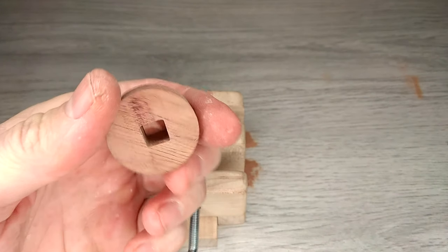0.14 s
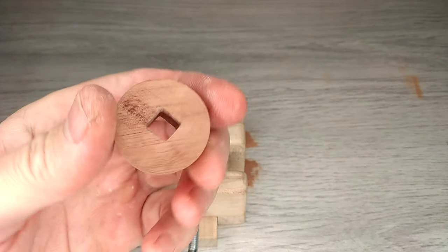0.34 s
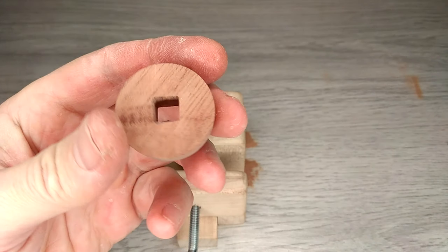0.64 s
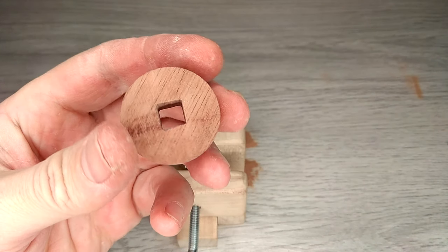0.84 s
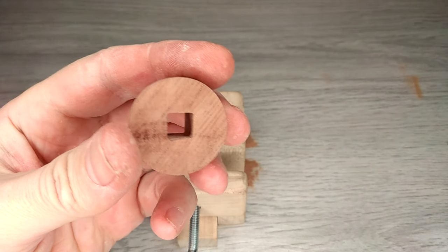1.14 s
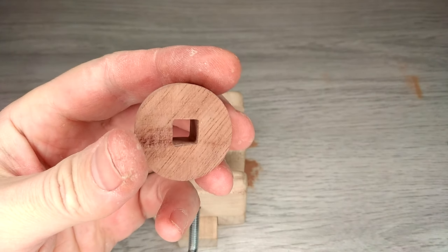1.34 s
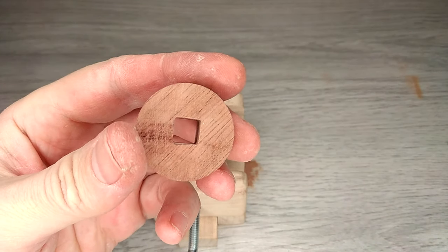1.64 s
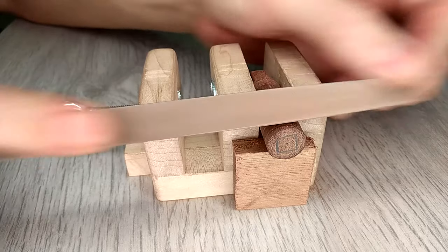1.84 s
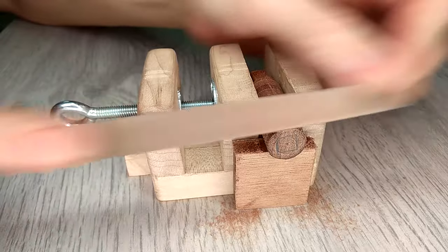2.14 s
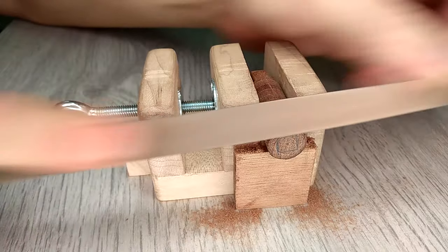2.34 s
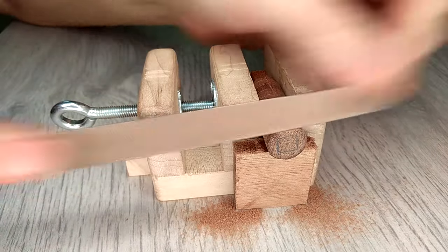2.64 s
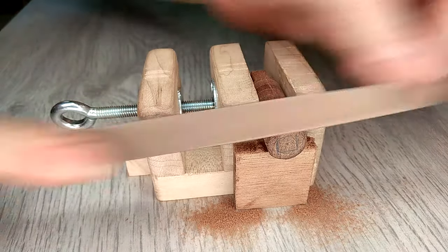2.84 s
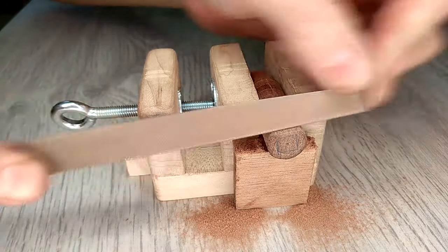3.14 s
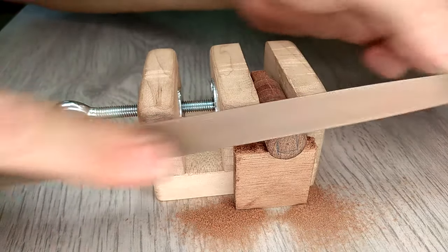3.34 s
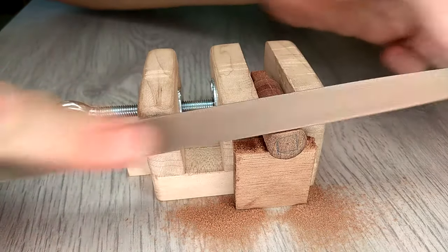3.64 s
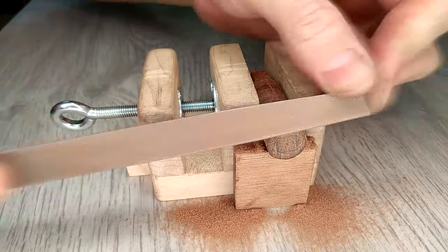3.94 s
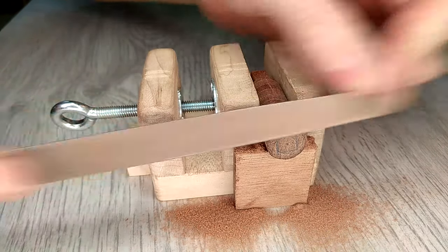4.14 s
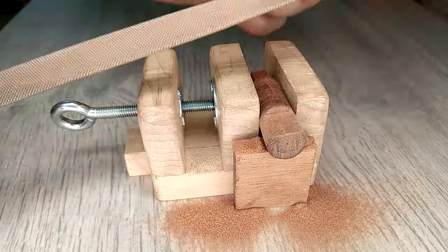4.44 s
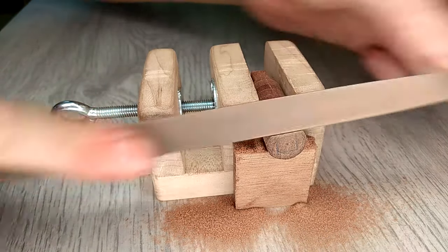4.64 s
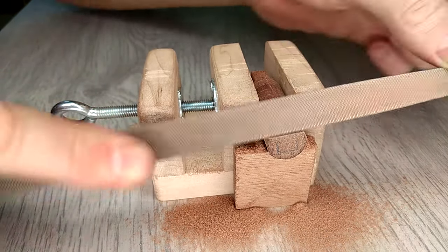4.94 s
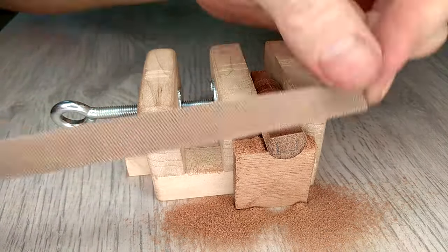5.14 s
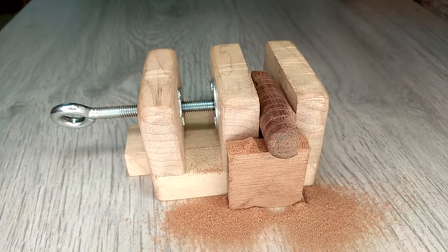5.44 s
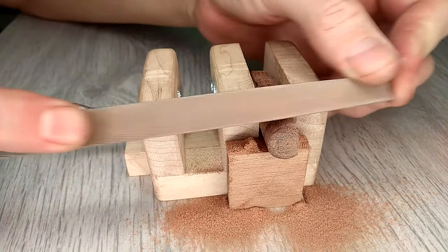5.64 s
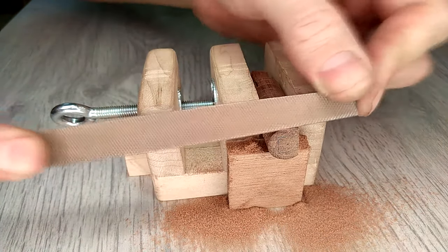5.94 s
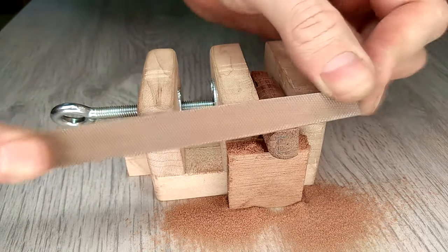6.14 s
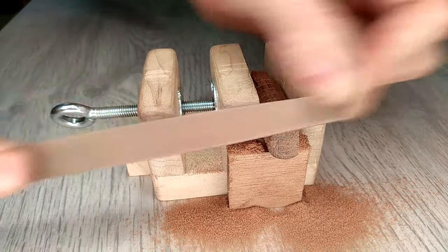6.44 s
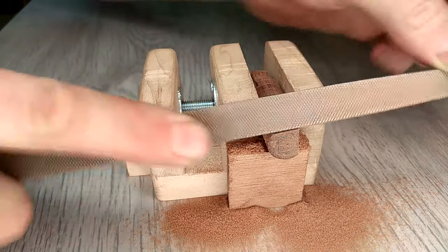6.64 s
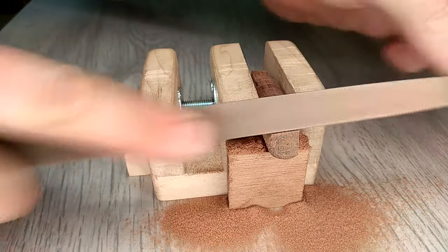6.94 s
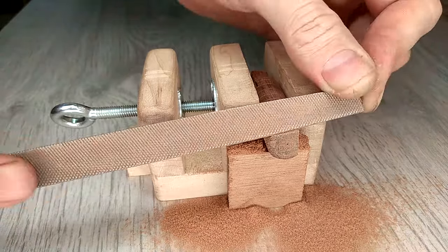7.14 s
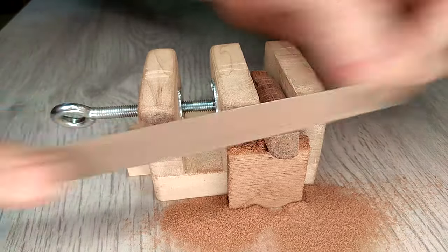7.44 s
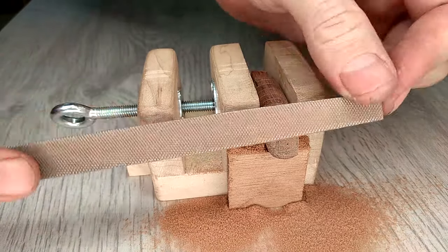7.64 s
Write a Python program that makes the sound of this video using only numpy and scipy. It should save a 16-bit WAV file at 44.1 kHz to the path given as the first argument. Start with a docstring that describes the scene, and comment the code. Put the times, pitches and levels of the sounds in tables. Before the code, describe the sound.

Soft thuds of hands on a table, then close filing of wood, with high metallic squeals and one brief pause.

```python
"""A bright hiss dies away; hands shift on a table top, which thuds softly over a faint room hiss.
From 1.8 s a steel file rasps to and fro over a dowel in a small wooden vise, close to a stereo microphone.
Its teeth tear fibres and shake vise, table and blade; the blade squeals in bursts. Pauses fade to silence.
Near 5.5 s the file lifts and the dowel is changed, with faint scratches and a thud.
Filing goes on to the end, with one low groan at 6.3 s."""
import sys
import numpy as np
from scipy import signal
from scipy.fft import rfft, irfft, next_fast_len
from scipy.io import wavfile
from scipy.ndimage import uniform_filter1d, map_coordinates

SR = 44100
rng = np.random.default_rng(int(sys.argv[2]) if len(sys.argv) > 2 else 0)


def digitize_waveform(pressure):
    """Quantize a signal to 16-bit integers and store it at the path in sys.argv[1].

    Rows of a 2-D input are taken as channels; values are limited to [-1, 1].
    """
    field = np.atleast_2d(pressure).T
    bounded = np.clip(field, -1, 1)
    quanta = np.round(bounded * 32767).astype(np.int16)
    wavfile.write(sys.argv[1], SR, quanta)


N = 343980
TIME_S = np.arange(N) / SR


def amp(db):
    return 10 ** (np.asarray(db) / 20)


def unit(x):
    return x / np.sqrt(np.mean(np.abs(x) ** 2) + 1e-20)


def along(points, hz):
    """Interpolate (frequency [Hz], value) points on a log axis."""
    knots_hz, values = np.transpose(points)
    return np.interp(np.log(hz + 1), np.log(knots_hz + 1), values)


def rounded(x, size):
    return uniform_filter1d(uniform_filter1d(x, size), size)


def curves(tables):
    """Each column per sample, then a gate open inside the tables' time spans."""
    times_s, *columns = np.concatenate(tables).T
    inside = sum((TIME_S >= rows[0][0]) & (TIME_S <= rows[-1][0]) for rows in tables) > 0
    tracks = [np.interp(TIME_S, times_s, column) for column in columns]
    return [rounded(track, 130) for track in tracks + [inside * 1.0]]


def wobble(rate_hz):
    """Smooth random curve, rate_hz knots a second."""
    knots = rng.standard_normal(int(N * rate_hz / SR) + 4)
    return map_coordinates(knots, [TIME_S * rate_hz])


def filtered(x, response):
    """Apply a complex frequency response."""
    size = next_fast_len(N + 2 ** 14)
    return irfft(rfft(x, size) * response(np.fft.rfftfreq(size, 1 / SR)), size)[..., :N]


def noise_pair():
    return rng.standard_normal((2, N))


def coloured(x, colour):
    """Shape x by (frequency [Hz], gain [dB]) points; unit rms."""
    return unit(filtered(x, lambda f: amp(along(colour, f))))


def body(modes, bed=((20, -60), (20000, -60))):
    """Gain of frequency: resonances summed in power over a smooth bed."""
    def gain(f):
        peaks = sum(amp(2 * db) * (f * width) ** 2 / ((hz * hz - f * f) ** 2 + (f * width) ** 2)
                    for hz, width, db in modes)
        return np.sqrt(peaks + amp(2 * along(bed, f)))
    return gain


# Hiss decay: (time [s], level [dB])
HISS_DECAY = [(0, -58), (.05, -64), (.1, -75), (.16, -100)]
# Hiss spectrum: (frequency [Hz], gain [dB])
HISS_COLOUR = [(2350, -66), (4000, -36), (4210, -15), (4780, -24), (6090, -1), (14300, -6), (15800, -6)]


def opening_hiss():
    """A bright hiss dies away."""
    level_db, gate = curves([HISS_DECAY])
    return amp(level_db) * gate * coloured(noise_pair(), HISS_COLOUR)


# Audible room, one list per span: (time [s], relative buzz level [dB])
ROOM_SPANS = [
    [(0.0, -88), (1.1, -85.5), (1.754, -86), (1.76, -99)],
    [(5.41, -100), (5.534, -88), (5.626, -92), (5.65, -83)],
]
# Room hiss spectrum: (frequency [Hz], gain [dB])
ROOM_COLOUR = [(180, -27), (300, -5.5), (410, -11), (740, -10), (930, -12.5), (1020, -19), (1230, -21.5),
               (2320, -22.5), (5900, -28.5), (9000, -25.5), (12400, -28), (12900, -50), (15000, -70)]
# Electrical buzz band: (frequency [Hz], width [Hz], gain [dB])
BUZZ_BAND = [(10800, 1500, 0)]
# Room tones: (frequency [Hz], relative level [dB])
ROOM_TONES = [(371.4, -88), (495.3, -92), (716.0, -96.5), (920.5, -99), (2055, -102)]


def room(mains_hz=60):
    """Hiss, faint tones and a thin high buzz that pulses with the mains."""
    buzz_db, gate = curves(ROOM_SPANS)
    hiss = coloured(noise_pair(), ROOM_COLOUR)
    mains_rad = 2 * np.pi * mains_hz * TIME_S
    pulses = amp(3.1 * np.cos(mains_rad) + 2.2 * np.cos(2 * mains_rad) + 1.5 * wobble(25))
    buzz = unit(filtered(noise_pair() * pulses, lambda f: body(BUZZ_BAND)(f) ** 1.4 * (f < 12700)))
    hum = sum(amp(db + 2 + 1.8 * wobble(8)) * np.sin(2 * np.pi * hz * TIME_S + 0.6 * wobble(6))
              for hz, db in ROOM_TONES)
    return gate * (amp(-78.5) * hiss + amp(buzz_db + 2.5) * buzz + hum)


# Drag before filing: (time [s], relative level [dB])
OPENING_DRAG = [(0.0, -79), (0.084, -54), (0.356, -77), (0.416, -63), (0.484, -62), (0.514, -86),
                (0.54, -67), (0.58, -50), (0.762, -63), (0.798, -79), (0.836, -58.5), (0.986, -63),
                (1.026, -65), (1.06, -61), (1.154, -61), (1.194, -65), (1.264, -57.5), (1.67, -61),
                (1.69, -59.5), (1.78, -57)]
# Drag at the dowel change: (time [s], relative level [dB])
REGRIP_DRAG = [(5.44, -69), (5.474, -58), (5.572, -59), (5.63, -62), (5.66, -55)]
# Table top under a hand: (frequency [Hz], width [Hz], gain [dB])
PALM_MODES = [(60, 40, -23), (106, 69, 0.5), (171, 39, 2.5), (240.5, 42, 1.5), (367, 30, -25)]


def skin_drag():
    """Skin drags over the table top and stirs its low modes."""
    level_db, gate = curves([OPENING_DRAG, REGRIP_DRAG])
    friction = noise_pair() * amp(3.4 * wobble(22.03))
    mid, side = unit(filtered(friction, lambda f: body(PALM_MODES)(f) ** 2.34 / (1 + (f / 420) ** 6)))
    return amp(level_db - 0.5) * gate * (0.95 * mid + 0.26 * side * [[1], [-1]])


# Hand pushes: (time [s], relative level [dB], pitch [Hz], swell time [s])
THUDS = [(0.08, -36, 169, 0.012), (0.411, -47, 170, 0.014), (0.546, -38.5, 187, 0.0038),
         (0.568, -36, 179, 0.003), (0.589, -35, 179, 0.0023), (0.71, -48, 254, 0.0079),
         (0.837, -43, 170.3, 0.017), (0.869, -47, 168, 0.012), (0.959, -43, 182, 0.0061),
         (1.056, -39.5, 166, 0.006), (1.075, -40.5, 176, 0.0053), (1.1, -52, 176, 0.004),
         (1.132, -37.5, 182, 0.0031), (1.155, -47, 175, 0.0054), (1.286, -49, 206, 0.012),
         (1.448, -57, 177, 0.013), (1.533, -40, 169, 0.004), (1.685, -41, 195, 0.0056),
         (1.738, -47, 192, 0.0084), (5.596, -35, 169, 0.0093), (7.636, -51, 189, .007)]


def thuds(knock_ratio=1.6, knock_db=-11.5, knock_decay_s=0.016):
    """Soft pushes swell in a low table mode and a higher, shorter one."""
    out, t = np.zeros(N + SR), np.arange(SR // 4) / SR
    for time_s, db, hz, swell_s in THUDS:
        age = t / (2 * max(swell_s, 0.002))
        envelope = amp(db - 9) * (age * np.exp(1 - age)) ** 2
        knock = amp(knock_db) * np.exp(-t / knock_decay_s) * np.sin(2 * np.pi * knock_ratio * hz * t)
        low_mode = np.sin(2 * np.pi * hz * t + rng.uniform(0, 2 * np.pi))
        out[round((time_s - swell_s) * SR):][:len(t)] += envelope * (knock + low_mode)
    return out[:N]


# Wooden blips, one low groan: (time [s], relative level [dB], pitch [Hz], half length [s])
BLIPS = [(.27, -88, 3980, .03), (.54, -80, 750, .02), (.61, -84, 2050, .09), (0.762, -79, 735, .03),
         (.81, -70, 507, 0.015), (.97, -69.5, 365, 0.027), (1.13, -67, 528, .02),
         (1.249, -79.5, 750, 0.033), (1.06, -80, 740, .04), (1.39, -85, 1420, .03), (1.4, -66, 511, 0.045),
         (1.53, -67, 371, 0.036), (1.6, -69, 722, 0.03), (1.7, -77, 810, .03), (5.494, -66, 500, .04),
         (5.49, -80, 930, .03), (5.58, -79, 880, 0.038), (5.614, -62.5, 623, .015),
         (6.329, -36, 289, 0.043), (7.664, -60, 400, 0.008)]


def blips():
    """Small wooden parts ring briefly at an unsteady pitch."""
    out = np.zeros(N + SR)
    for time_s, db, hz, half_s in BLIPS:
        t = TIME_S[:int(half_s * 2 * SR)]
        drift_rad = 0.045 * uniform_filter1d(np.cumsum(rng.standard_normal(SR // 4)), size=300)
        ring = np.sin(2 * np.pi * hz * t + drift_rad[:len(t)])
        out[round((time_s - half_s) * SR):][:len(t)] += amp(db) * np.hanning(len(t)) * ring
    return out[:N]


# File strokes, one list each, first to last contact: (time [s], relative cutting level [dB],
# blade hiss offset [dB], vise growl offset [dB], table shake offset [dB], blade ring offset [dB])
STROKES = [
    [(1.965, -39, -2, 5, 1.5, 0), (2.017, -36, -5.5, 1.5, -10, 1), (2.11, -35, -4, 1, -9, 0.5),
     (2.18, -35, -4, -4, -10.5, 0), (2.33, -36, -4, 4, -10.5, -2), (2.399, -34.5, -4, 1, -11.5, -1.5),
     (2.467, -36, -2.5, 2.5, -8.5, 0.5), (2.545, -36.5, -6, 5.5, -13, -4)],
    [(2.84, -36.5, -3, -1, -7, 5), (2.908, -37, -2, -5.5, -13.5, 6), (3.0, -37.5, -2, -0.5, -10.5, 5.5),
     (3.11, -40, -1.5, -2, -11.5, 1), (3.2, -39, -4.5, 4.5, -10.5, -2.5), (3.37, -39, -2.5, 0.5, -9.5, 4.5),
     (3.46, -36.5, -3.5, -2, -15, -2.5)],
    [(3.6, -39, -2, 7, -5.5, -4.5), (3.626, -36.5, -2.5, 3.5, -8.5, 1.5), (3.79, -38.5, -2, 2, -11.5, 0.5),
     (3.884, -38.5, -5, 7.5, -9, -6), (3.905, -40.5, -4.5, 5.5, -6.5, -9)],
    [(3.92, -39, -4, 6.5, -6.5, -0.5), (3.954, -37, -0.5, -1.5, -10.5, -4.5),
     (4.002, -35.5, -2, -5, -8.5, -3.5), (4.06, -40.5, 1, -1.5, -6, 6.5), (4.07, -38, -2, -10.5, -8, 4)],
    [(4.111, -38.5, 1, -2, -9, 10.5), (4.133, -37.5, -2.5, -3.5, -9, 1.5),
     (4.247, -40, -1, -0.5, -12.5, 6.5), (4.409, -40, -1.5, 1.5, -10, 1), (4.43, -45, 0, -5.5, -18, 4.5)],
    [(4.64, -41, -0.5, 3.5, -13.5, 10), (4.788, -39, -1.5, -1, -10, -1), (4.962, -40, 0, 1, -10.5, 1.5),
     (5.022, -38.5, -0.5, -0.5, -11, -5), (5.055, -39, -1.5, -0.5, -12.5, 7.5)],
    [(5.784, -40.5, -5, 3.5, -2, -19), (5.814, -38.5, -4.5, 6.5, -2.5, -11),
     (5.93, -35.5, -1.5, -0.5, -10, 3), (6.124, -36.5, 0, -1, -10.5, 4), (6.19, -38.5, -0.5, -1, -7, 6.5)],
    [(6.2, -40.5, 1, 2, -10.5, 1), (6.236, -43, -0.5, 3.5, -5.5, 3.5), (6.262, -43, -1, 0, -3, -2.5),
     (6.332, -42.5, -1, 4, -6, -11), (6.392, -45, 1.5, -4, 2.5, -7.5)],
    [(6.41, -41.5, 0.5, 8.5, -4, -18), (6.434, -36, -2, -2.5, -14, 1), (6.56, -36.5, -0.5, 2, -12, 3),
     (6.68, -38.5, 1, -2, -9.5, 5), (6.76, -39, 1.5, 5, -11, 6.5), (6.85, -36.5, 0.5, -3, -10, 2),
     (6.97, -37.5, 0, 1.5, -9.5, -1), (7.088, -37, 0, -6.5, -14.5, -4.5), (7.115, -40, -1, 2, -12.5, 8)],
    [(7.245, -37.5, 2.5, 2.5, -12.5, -7), (7.283, -37.5, -1, -8.5, -15.5, 5), (7.349, -39, 3, 1, -9.5, 2),
     (7.507, -38, 1, 0.5, -7.5, 0), (7.56, -37.5, 1, -1.5, -10.5, 5.5)],
    [(1.805, -52, 0.5, 5, 7, 3), (1.867, -41.5, -5, 6.5, 2, -3), (1.915, -36, -6, -1, -7.5, 0)],
    [(2.59, -35.5, -2.5, -1, -6, 5), (2.682, -38, 1, -3.5, -15, 6.5), (2.715, -37, -4, 3.5, -9, 0)],
    [(5.243, -40, -1, -2, -5.5, 2), (5.273, -38.5, -1.5, 6.5, -5.5, 4),
     (5.356, -37.5, -0.5, -4, -11.5, 3.5)],
    [(5.665, -52.5, -3.5, 5.5, 10.5, -10.5), (5.689, -56, -4.5, 5, 10.5, -4), (5.7, -46, -6.5, 7, 7, -5)],
    [(5.715, -42, -3.5, 10.5, -3, -12), (5.728, -39.5, -6, 5, -2, -15), (5.744, -42, -7, 4, -3, -21)],
    [(7.73, -37.5, 1.5, 2.5, -4, -10.5), (7.756, -38.5, -2, 4, -17.5, 5.5), (7.795, -37.5, 1.5, 1.5, -7, 5)],
    [(1.758, -73.5, -8, 6, 12, -4), (1.785, -75.5, -5, -8, 2, -5)],
    [(4.556, -59, -4.5, 3, -6.5, -5.5), (4.566, -54, -9.5, 10, -1, -7)],
    [(4.605, -61, -12, -19, 13.5, -8), (4.61, -52.5, -8, 9, 6, -8)],
    [(5.424, -71, -7, -14, -2, -7), (5.436, -67.5, -15, -5, 2, -8)],
    [(7.135, -62.5, -8, -7, -6.5, -2), (7.152, -74, -6, -11, 12.5, -7)],
    [(7.668, -90.5, -18, 20, 28, -8), (7.69, -76, 5, -6, 13.5, -7)],
]


def strokes(rise_db_per_s=1344.5, fall_db_per_s=1150, silence_db=-101):
    """Levels of the loudest stroke per sample; before and after each stroke the sound fades to silence."""
    growl_lingers, shake_lingers = 0.051, 0.36  # share of the fade these layers do not follow
    t = np.arange(0, N / SR, 1e-3)
    loudness, levels = [], []
    for rows in STROKES:
        times_s, *columns = np.transpose(rows)
        cut, hiss, growl, shake, ring = [np.interp(t, times_s, column) for column in columns]
        away_db = rise_db_per_s * np.maximum(times_s[0] - t, 0)
        away_db += fall_db_per_s * np.maximum(t - times_s[-1], 0)
        fade = np.minimum(away_db, cut - silence_db)
        loudness.append(cut - away_db)
        levels.append([cut - fade, hiss, growl + growl_lingers * fade, shake + shake_lingers * fade, ring])
    loudest = np.array(levels)[np.argmax(loudness, axis=0), :, np.arange(len(t))].T
    return [np.interp(TIME_S, t, uniform_filter1d(column, size=13)) for column in loudest]


def tearing(scatter_db, chatter_db, chatter_hz, patchy_db):
    """Dense, uneven fibre snaps; the grip chatters and the colour shifts in patches as the contact moves."""
    snaps = noise_pair() * amp(scatter_db * rng.standard_normal(N))
    hz, _, spectra = signal.stft(snaps, SR, nperseg=1024)
    patches = uniform_filter1d(rng.standard_normal(spectra.shape[1:]), size=3, axis=0)
    patches = unit(uniform_filter1d(patches, size=6, axis=1))
    depth_db = patchy_db * np.clip(hz / 4000, 0, 1)[:, None]  # low modes hold steadier
    _, snaps = signal.istft(spectra * amp(depth_db * patches), nperseg=1024)
    return snaps[:, :N] * amp(chatter_db * wobble(chatter_hz))


def wandering(x, gain, shift, rate_hz):
    """Resonances drift up and down by the fraction shift as the contact travels."""
    low, high = filtered(x, lambda f: np.array([gain(f * (1 + shift)), gain(f * (1 - shift))])[:, None])
    mix = 0.5 + 0.5 * np.tanh(2.1 * wobble(rate_hz))
    return unit(mix * low + (1 - mix) * high)


# Vise and dowel: (frequency [Hz], width [Hz], gain [dB])
VISE_MODES = [(879, 27, -4.5), (1001, 185, -9.5), (1194, 47, -10.5), (1373, 33, -11.5), (1570, 50, -11),
              (1847, 34, -6), (1933, 56, -5), (2342, 38, -11), (2650, 410, -16.5), (3430, 110, -14.5),
              (4154, 60, -16.5), (4680, 92, -19.5), (5360, 220, -19)]
# Tearing between those modes: (frequency [Hz], gain [dB])
WOOD_BED = [(400, -56), (800, -28.5), (1200, -25), (2500, -16.5), (3150, -19), (3750, -22.5), (4300, -27.5),
            (5600, -19.5), (7500, -19.5), (9000, -53)]
# Vise rocking on the table: (frequency [Hz], width [Hz], gain [dB])
ROCKING_MODES = [(482, 45, -10.5), (580.4, 48, 0.5), (652, 39, -1), (683.5, 28, 1.5)]
# Blade on the first dowel: (frequency [Hz], width [Hz], gain [dB])
FIRST_BLADE_MODES = [(6060, 70, -6.5), (6300, 90, -9.5), (7180, 130, -1), (8060, 140, -9.5),
                     (8580, 190, -1), (9470, 480, -5), (9950, 140, -6.5), (10670, 280, -3.5),
                     (11450, 150, -5.5), (13300, 160, -12.5), (14200, 500, -18.5), (15600, 300, -20.5)]
# Blade held anew on the second dowel: (frequency [Hz], width [Hz], gain [dB])
SECOND_BLADE_MODES = [(4024, 130, -4.5), (4700, 150, -24), (5120, 170, -24), (5340, 139, -26),
                      (6160, 130, -29), (6885, 85, 7), (7420, 170, 0.5), (7410, 150, 4), (8110, 48, 5.5),
                      (8330, 47, 6), (8800, 80, -1), (9500, 480, -2), (10000, 390, -1), (10740, 340, -4),
                      (11430, 180, -1.5), (12020, 120, -4.5), (12760, 150, -10.5), (13400, 130, -6),
                      (14300, 500, -14), (15600, 300, -10)]
# Hiss between the blade modes: (frequency [Hz], gain [dB])
STEEL_BED = [(4500, -31), (6000, -15), (7800, -3.5), (9000, -12.5), (11500, -10), (12500, -14.5),
             (15500, -27.5)]
# Table top: (frequency [Hz], width [Hz], gain [dB])
TABLE_MODES = [(106, 22, -12), (171.6, 15.6, 0.5), (260, 53, -3.5), (300.6, 51, 2.5)]


def rasp(start_s=1.73, dowel_change_s=5.55):
    """Teeth tear fibres and shake the vise, the blade and the table under them."""
    cut_db, hiss_db, growl_db, shake_db, _ = strokes()
    grip = amp(cut_db + 0.15 * wobble(30)) * (TIME_S > start_s)
    fibres = tearing(scatter_db=2.5, chatter_db=0.25, chatter_hz=360, patchy_db=3)
    wood = wandering(fibres, body(VISE_MODES, WOOD_BED), shift=0.0062, rate_hz=9)
    rocking = tearing(scatter_db=2.5, chatter_db=1.2, chatter_hz=210, patchy_db=0.57)
    growl = wandering(rocking, lambda f: body(ROCKING_MODES)(f) ** 1.11, shift=0.013, rate_hz=7.9)
    scrape = tearing(scatter_db=1.5, chatter_db=0.6, chatter_hz=430, patchy_db=2.5)
    first_blade = unit(filtered(scrape, body(FIRST_BLADE_MODES, STEEL_BED)))
    second_blade = unit(filtered(scrape, body(SECOND_BLADE_MODES, STEEL_BED)))
    steel = np.where(TIME_S > dowel_change_s, amp(1.5) * second_blade, first_blade)
    shaking = tearing(scatter_db=2, chatter_db=2, chatter_hz=150, patchy_db=0.5)
    table = unit(filtered(shaking, lambda f: body(TABLE_MODES)(f) ** 1.35 / (1 + (55 / (f + 1)) ** 2)))
    return grip * (amp(4) * wood + amp(growl_db + 0.5) * growl
                   + amp(hiss_db + 3) * steel + amp(shake_db + 0.5) * table)


# Light file contacts: (time [s], relative level [dB], decay time [s])
TOUCHES = [(1.758, -57, 0.012), (1.796, -28.5, 0.01), (4.603, -34, 0.01), (5.423, -47, 0.0092),
           (5.654, -36.5, 0.012), (5.714, -23, 0.008), (6.395, -20, 0.013), (7.204, -55, 0.009),
           (7.659, -66, 0.005), (7.7, -41, 0.014)]


def touches(rise_s=0.002):
    """The file brushes the wood between strokes: a dying scrape through the rocking vise."""
    push, t = np.zeros(N + SR), np.arange(SR // 10) / SR
    for time_s, db, decay_s in TOUCHES:
        envelope = (1 - np.exp(-t / rise_s)) * np.exp(-t / decay_s)
        push[round(time_s * SR):][:len(t)] += amp(db - 11) * envelope
    return push[:N] * unit(filtered(noise_pair(), body(VISE_MODES + ROCKING_MODES, WOOD_BED)))


# Moving blade resonance: (time [s], centre [Hz], thread share [0-1], broad band spread [0-1])
BLADE_RESONANCE = [(1.8, 6306, 0.1, .1), (2.1, 6163, .1, 0.1), (2.5, 6200, 0.1, 0.3), (2.6, 6500, .1, .6),
                   (2.7, 6740, 0.1, 0.5), (3.2, 6732, 0.2, 0.5), (3.45, 6830, .3, .4), (3.75, 6780, .2, .5),
                   (3.8, 6930, 0.2, 0.5), (4.07, 6950, 0.2, .6), (4.1, 6835, 0.4, 0.5),
                   (4.45, 6880, 0.5, 0.5), (4.66, 7034, 0.5, .2), (4.85, 7140, 0.3, .3),
                   (5.3, 7155, 0.2, 0.6), (5.8, 6947, .3, 0.7), (6, 7300, 0, .8), (6.5, 7330, .3, 1),
                   (7.1, 7550, 0.02, 0.8), (7.25, 7890, .3, .8), (7.55, 8240, 0.1, .8),
                   (7.8, 7800, .3, 0.8)]


def blade_ring():
    """The blade's free length sings: a broad flickering band with a thin thread in it."""
    centre_hz, purity, spread, _ = curves([BLADE_RESONANCE])
    cut_db, *_, ring_db = strokes()
    purity, spread = np.clip(purity, 0, 1), np.clip(spread, 0, 1)
    contact = np.clip(amp(cut_db + 50.5), 0, 1)  # silent where the cutting level fades away

    def band(width_hz, stray_hz):
        slow = filtered(rng.standard_normal((2, 2, N)), lambda f: 1 / (1 + (f / width_hz) ** 2))
        phase = 2 * np.pi * np.cumsum(centre_hz + stray_hz * wobble(18)) / SR
        return unit(slow[0] * np.cos(phase) + slow[1] * np.sin(phase))
    thread = unit(band(width_hz=76, stray_hz=50.14) * amp(3.5 * np.tanh(wobble(50))))  # stick-slip
    broad = np.sqrt(1 - spread) * band(width_hz=320, stray_hz=60)
    broad += np.sqrt(spread) * band(width_hz=430, stray_hz=99.1)
    ring = np.sqrt(purity) * thread + np.sqrt(1 - purity) * broad
    return amp(cut_db + ring_db - 2.5) * contact * ring


# Blade squeals: (time [s], level [dB], pitch [Hz], half length [s])
SQUEALS = [(1.91, -34, 6370, .015), (2.023, -37, 6080, .015), (2.058, -32, 6010, 0.014),
           (2.1, -32.5, 6220, .015), (2.133, -34.5, 6110, .02), (2.656, -36, 6800, .012),
           (2.698, -32, 6700, .02), (2.846, -34.5, 6720, .016), (2.946, -34, 6700, 0.014),
           (2.966, -32, 6820, .015), (3.005, -33.5, 6750, .012), (3.028, -28, 6800, 0.014),
           (3.044, -27, 6670, 0.02), (3.069, -28.5, 6760, .015), (3.092, -34, 6960, .013),
           (3.179, -28, 6760, .02), (3.272, -34.5, 6700, .015), (3.299, -30.5, 6700, .02),
           (3.32, -33.5, 6760, 0.014), (3.358, -29.5, 6740, .018), (3.391, -27.5, 6850, 0.018),
           (3.445, -29, 6800, 0.022), (3.723, -23, 6690, 0.023), (3.918, -35, 6860, 0.012),
           (4.015, -33.5, 7040, .015), (4.055, -30, 6950, 0.024), (4.116, -29, 6780, .025),
           (4.217, -28, 6870, .018), (4.254, -28.5, 6890, .03), (4.292, -31, 6830, .016),
           (4.332, -31, 6860, .014), (4.39, -24.5, 6900, .018), (4.416, -32.5, 6870, .012),
           (4.655, -28, 6840, .025), (4.67, -33, 7150, 0.014), (4.703, -30, 7130, .014),
           (4.733, -33.5, 7150, .025), (4.837, -33, 7200, .015), (4.89, -37, 7260, .02),
           (4.952, -33, 7130, .02), (5.044, -32.5, 7050, 0.031), (5.258, -33.5, 7170, .015),
           (5.289, -33.5, 7070, .022), (5.325, -27, 7130, 0.016), (5.346, -34, 7130, .015),
           (5.98, -31, 7340, .015), (6.569, -29, 7200, .015)]


def squeals(stray_hz=36):
    """The blade's ring locks into short, unsteady whistles."""
    out = np.zeros((2, N))
    drift_rad = 2 * np.pi * np.cumsum(stray_hz * wobble(150)) / SR
    quadrature_rad = np.array([[0], [np.pi / 2]])
    for time_s, db, hz, half_s in SQUEALS:
        span = np.arange(round((time_s - half_s) * SR), round((time_s + half_s) * SR))
        whistle = np.sin(2 * np.pi * hz * span / SR + drift_rad[span] + quadrature_rad)
        out[:, span] += amp(db) * np.hanning(len(span)) * whistle
    return out


# Scratches with the file lifted: (time [s], level [dB], half length [s])
SCRATCHES = [(5.435, -76, 0.013), (5.46, -78, 0.009), (5.526, -68, 0.017), (5.562, -76, .015),
             (5.59, -79, .015)]
# Scratch spectrum: (frequency [Hz], gain [dB])
SCRATCH_COLOUR = [(800, -14), (2500, -8), (5000, -9), (9000, -3.5), (13000, 1), (15800, -4)]


def scratches():
    """Faint, dry scuffs with a gritty grain."""
    envelope = sum(amp(db) * np.exp(-((TIME_S - time_s) / half_s) ** 2) for time_s, db, half_s in SCRATCHES)
    grit = noise_pair() * amp(3 * wobble(400))
    return envelope * coloured(grit, SCRATCH_COLOUR)


# Microphone ports: (frequency [Hz], left minus right [dB], left lead apart from delay [rad], likeness [0-1])
MIC_PORTS = [(40, -1.5, 0.3, .65), (110, -1, 0.1, .92), (250, -4, 0.4, 0.99), (430, -0.4, 0.6, .8),
             (700, -7, .9, 0.86), (800, -4.5, 1.24, .75), (1040, -3.5, 1.33, 0.3), (1207, -2, 0.34, .45),
             (1380, -1.5, 1.85, .45), (1560, -6.5, -.3, .5), (1820, 0, 0.1, .8), (2010, 1.5, 0, .75),
             (2270, -5.5, -.5, .2), (2660, -2, 0, .63), (2930, 0, -0.4, .15), (3424, 2, -2.2, .35),
             (3650, -1.5, 0.4, 0.3), (3950, 1, 0, 0), (4205, -.7, -0.7, .35), (4820, 0, -0.1, .8),
             (5100, -0.5, 0, .45), (5790, 0, 0, .36), (5990, -4, 2.5, .6), (6460, 0, 4, .15),
             (6770, 5.5, 5, 0.6), (6920, -2.5, 5, .45), (7200, -4.5, 6.5, .63), (7690, -2.5, 10, .6),
             (7900, -3, 8, .2), (8100, .8, 7.5, .5), (8220, -7, 6.8, .22), (8600, -4, 8.4, .47),
             (8790, 1, 9.5, .13), (9300, -1.5, 11, .48), (9600, -3, 11.5, .35), (9930, -1.5, 12, .51),
             (10300, -0.5, 11.5, .2), (10680, 0, 9, .38), (11020, -3, 11, .2), (11460, -4, 11, .5),
             (11890, 0.5, 12, .75), (12400, -2, 13, .24), (12830, -2, 14.2, .2), (13350, -1, 9.5, .49),
             (14300, 1, 12, .2), (14640, -0.5, 11, .54), (14900, -0.5, 10, .31), (15850, -2, 16, .05)]


def microphone(pair, left_lag_s=18 / SR):
    """Two unrelated signals reach the left and right ports partly alike, tilted and delayed."""
    hz, *columns = np.transpose(MIC_PORTS)

    def response(f, sign):
        lean_db, lead_rad, likeness = [rounded(np.interp(f, hz, column), 400) for column in columns]
        mix_rad = np.arccos(np.clip(likeness, 0, 1)) / 2
        phase_rad = lead_rad - 2 * np.pi * f * left_lag_s
        placement = amp(sign * lean_db / 2) * np.exp(0.5j * sign * phase_rad)
        return placement * [np.cos(mix_rad), sign * np.sin(mix_rad)]
    return np.array([filtered(pair, lambda f: response(f, sign)).sum(axis=0) for sign in (1, -1.003)])


def scene():
    """File, hands and room."""
    filing = microphone(rasp() + blade_ring() + squeals() + touches())
    hands = (thuds() + blips()) * amp([[0.6], [-0.6]]) + skin_drag()
    return filing + hands + room() + opening_hiss() + scratches()


def record(dry, top_hz=15800, taper_hz=150):
    """The recorder keeps nothing above its band limit."""
    return filtered(dry, lambda f: np.sin(np.pi / 2 * np.clip((top_hz - f) / taper_hz, 0, 1)) ** 2)


dry = scene()
out = record(dry)
digitize_waveform(out)
```